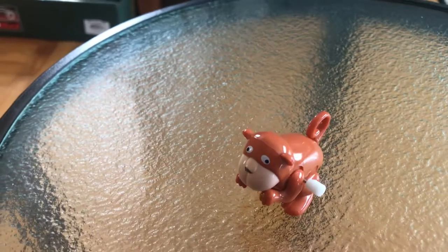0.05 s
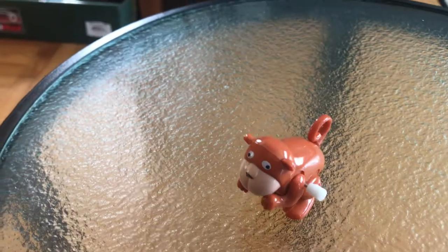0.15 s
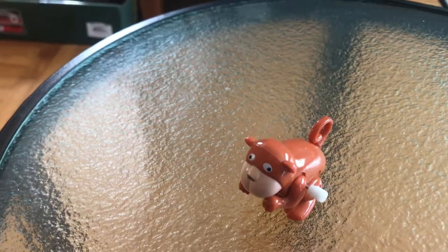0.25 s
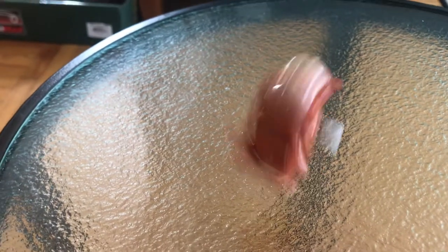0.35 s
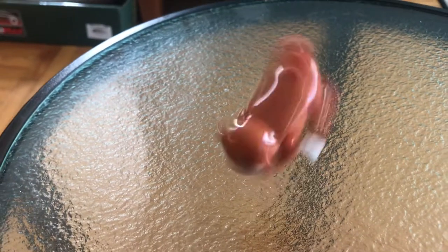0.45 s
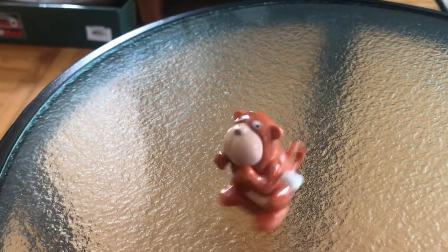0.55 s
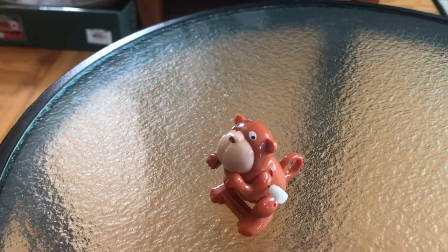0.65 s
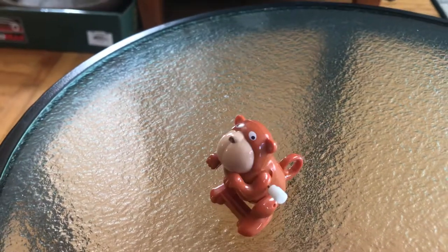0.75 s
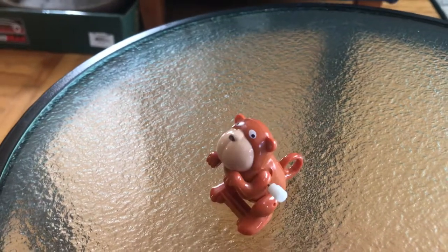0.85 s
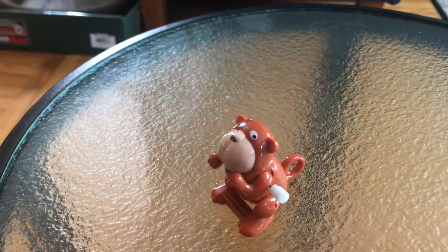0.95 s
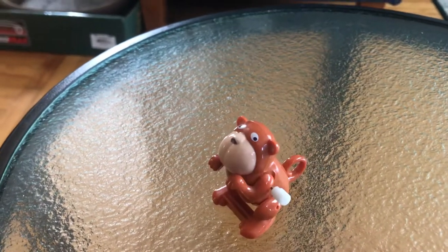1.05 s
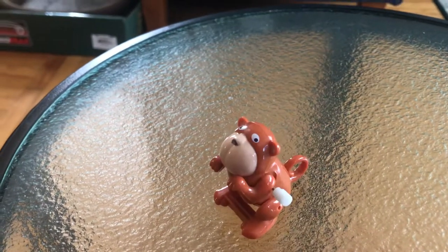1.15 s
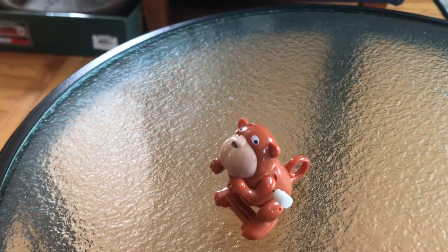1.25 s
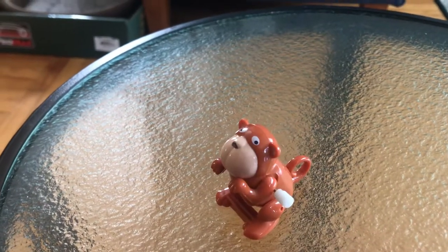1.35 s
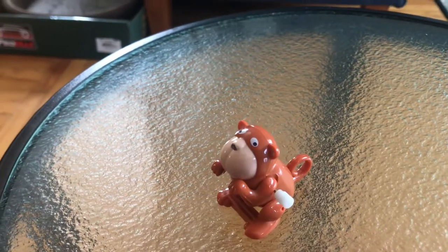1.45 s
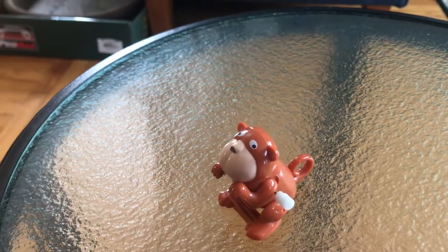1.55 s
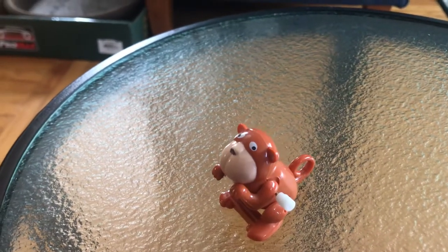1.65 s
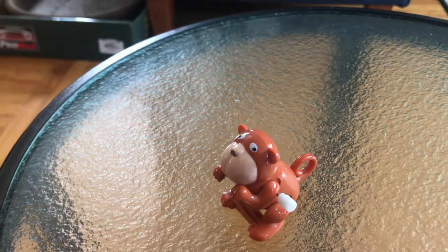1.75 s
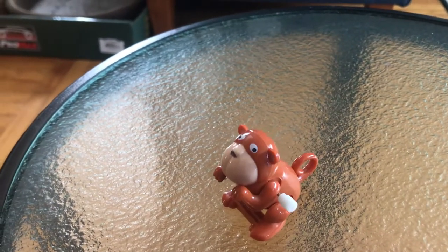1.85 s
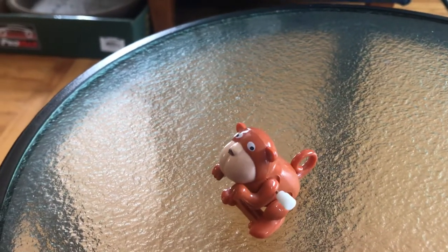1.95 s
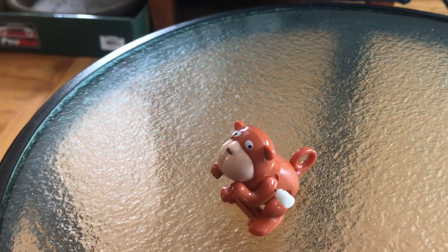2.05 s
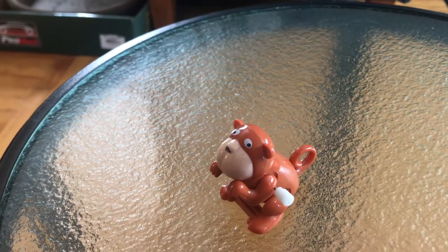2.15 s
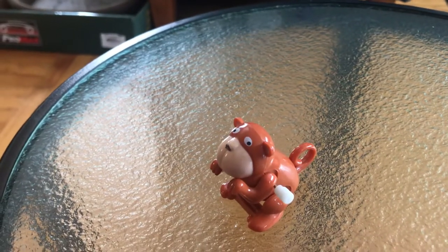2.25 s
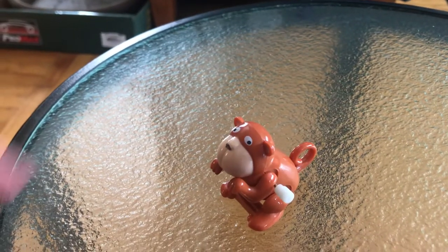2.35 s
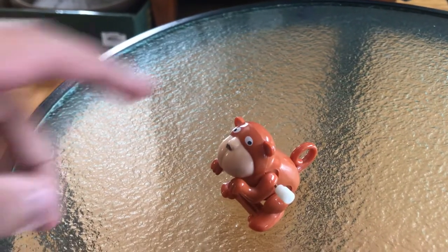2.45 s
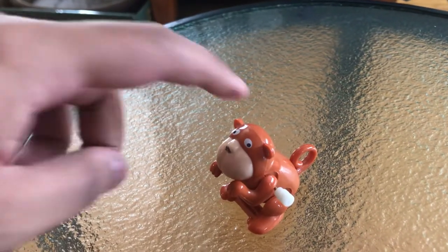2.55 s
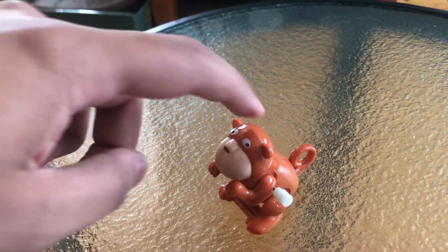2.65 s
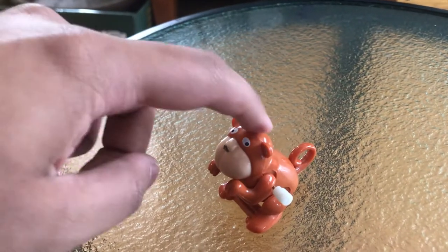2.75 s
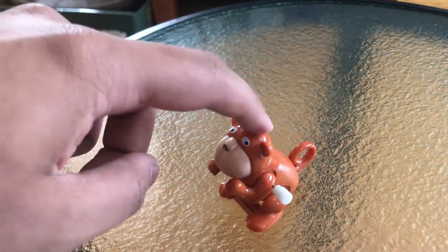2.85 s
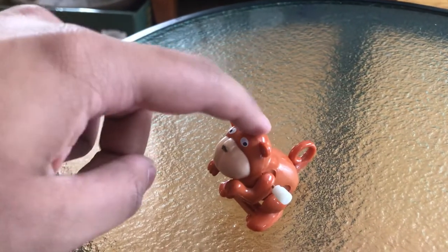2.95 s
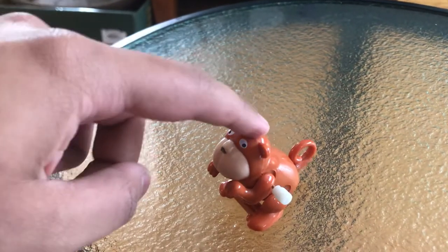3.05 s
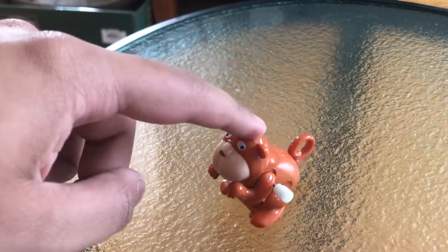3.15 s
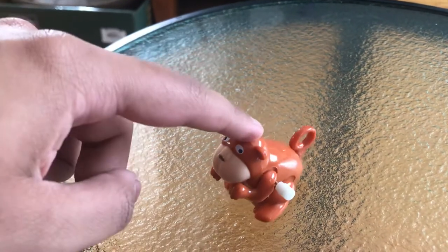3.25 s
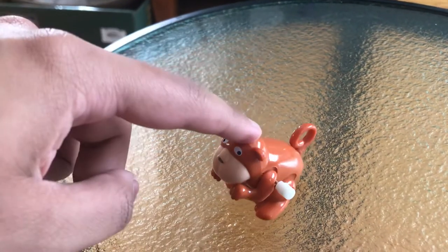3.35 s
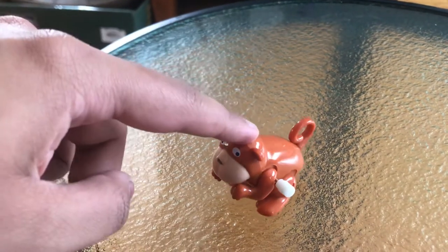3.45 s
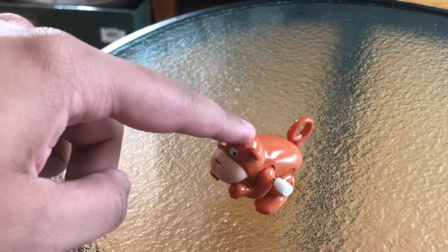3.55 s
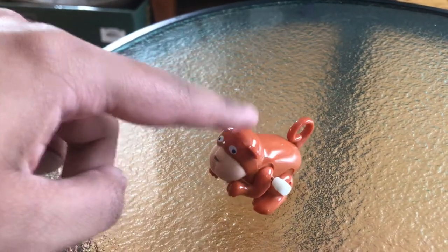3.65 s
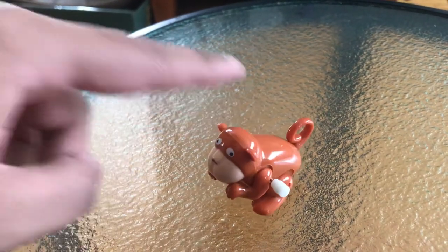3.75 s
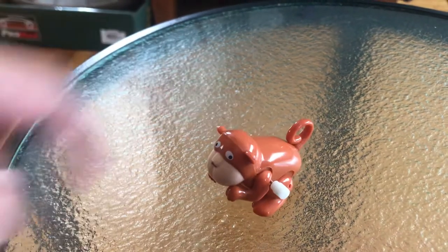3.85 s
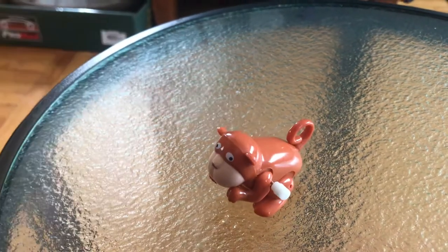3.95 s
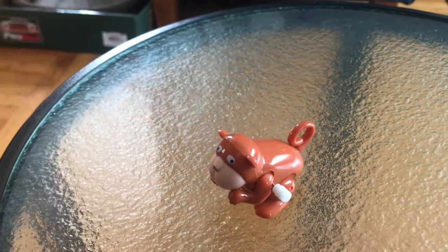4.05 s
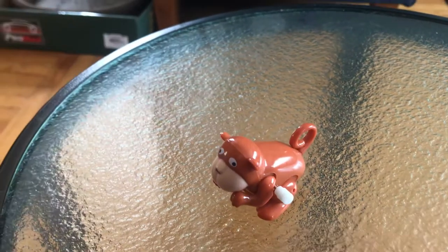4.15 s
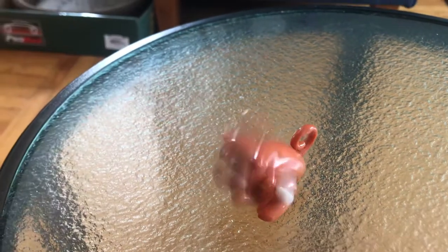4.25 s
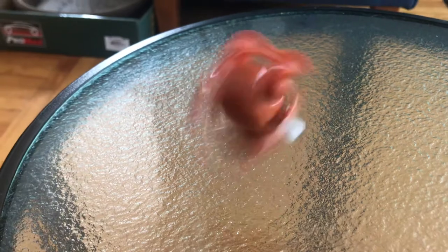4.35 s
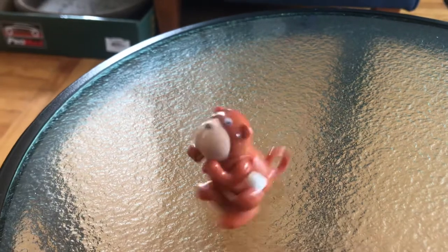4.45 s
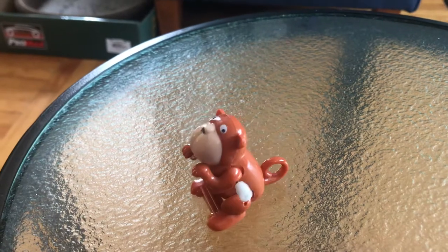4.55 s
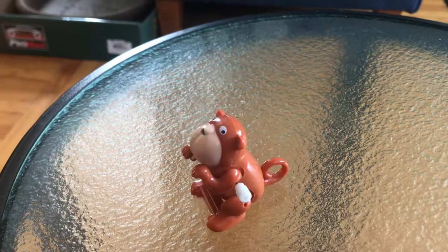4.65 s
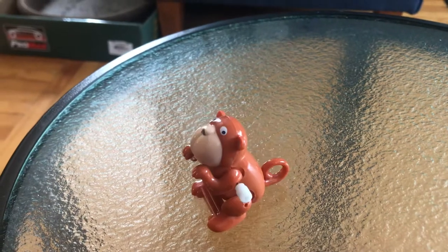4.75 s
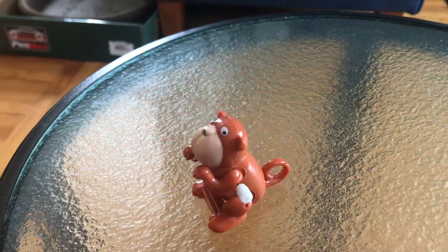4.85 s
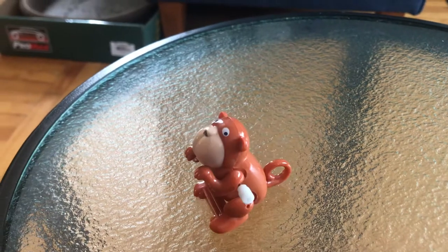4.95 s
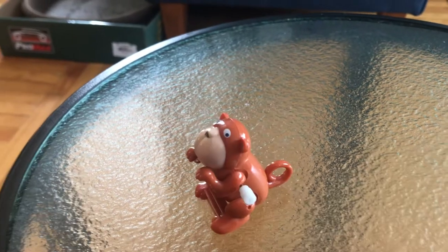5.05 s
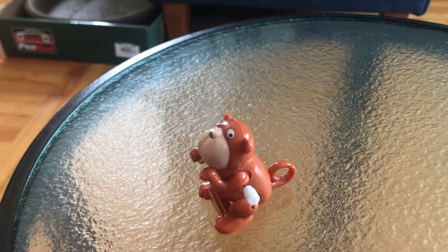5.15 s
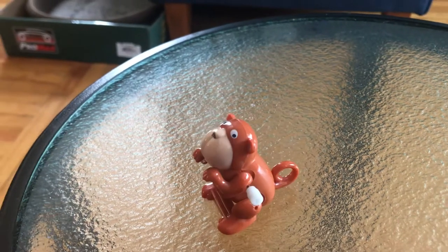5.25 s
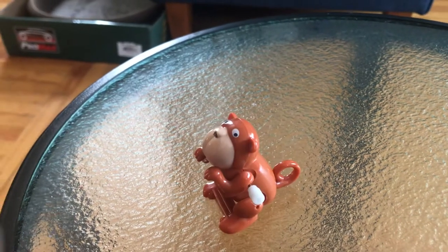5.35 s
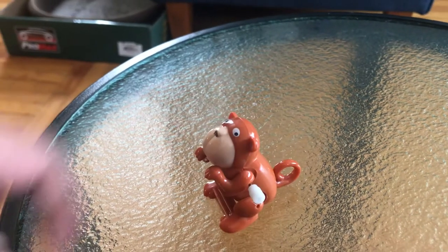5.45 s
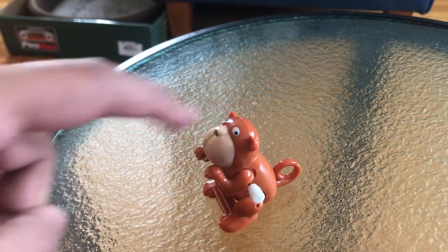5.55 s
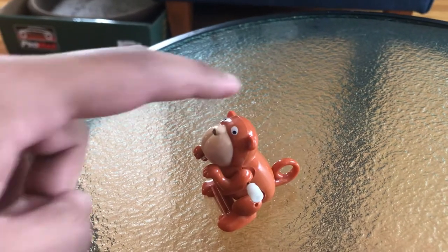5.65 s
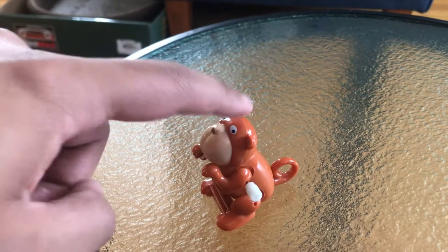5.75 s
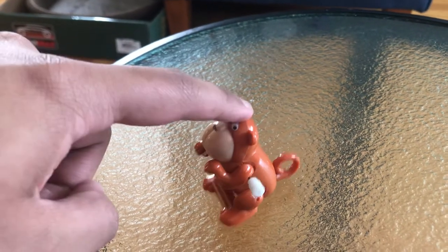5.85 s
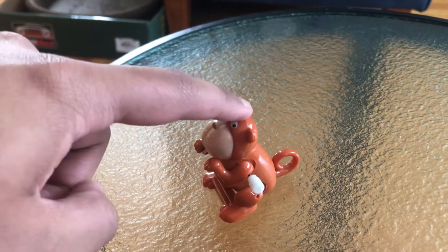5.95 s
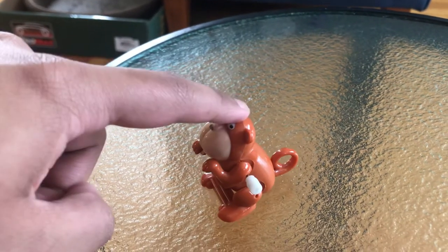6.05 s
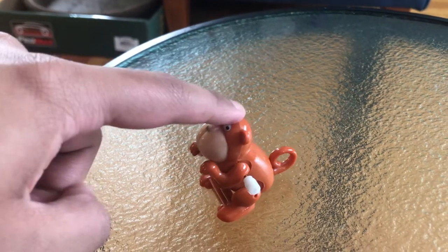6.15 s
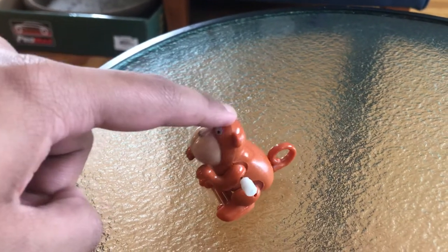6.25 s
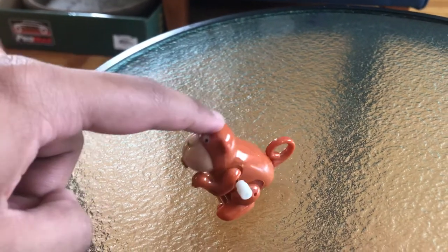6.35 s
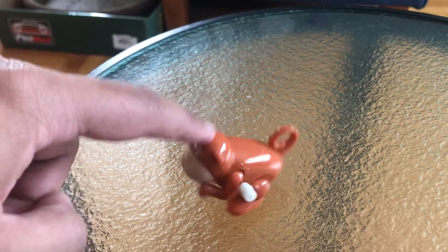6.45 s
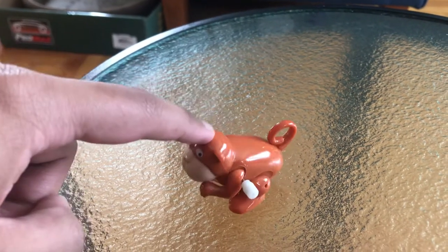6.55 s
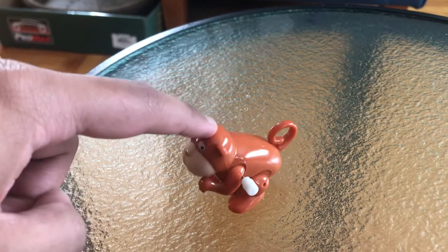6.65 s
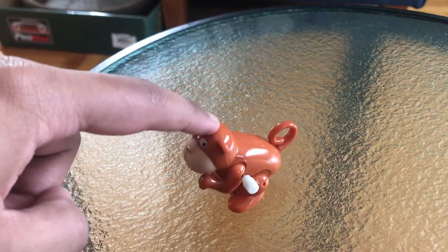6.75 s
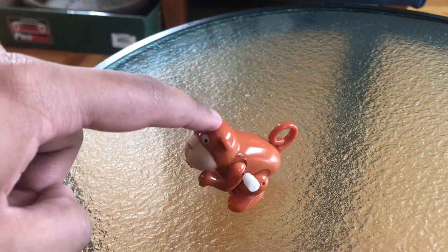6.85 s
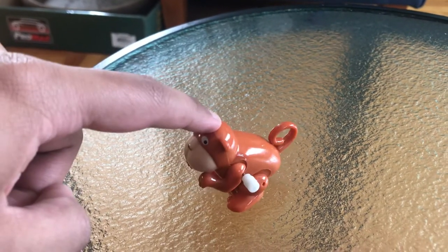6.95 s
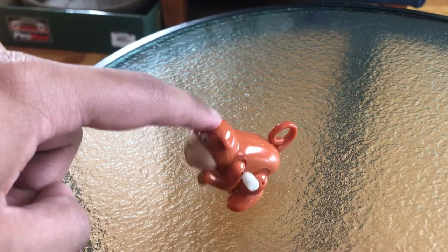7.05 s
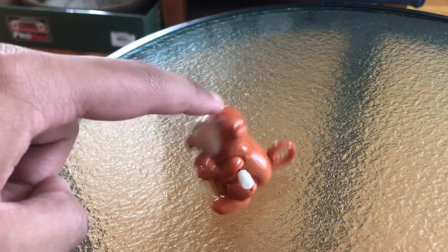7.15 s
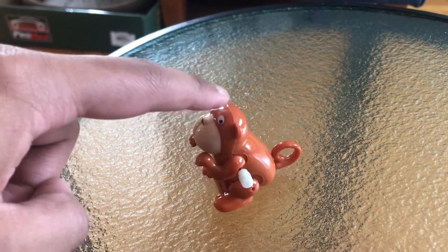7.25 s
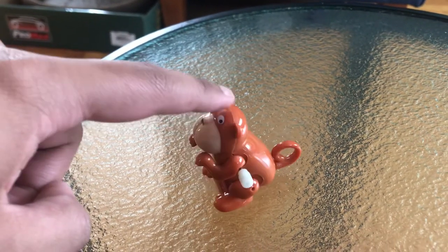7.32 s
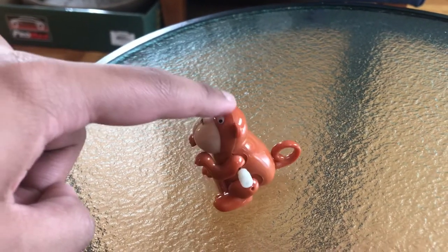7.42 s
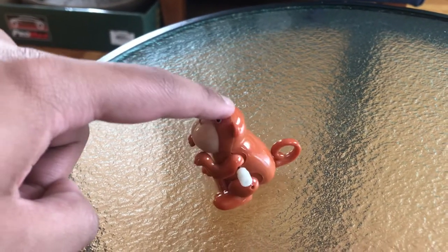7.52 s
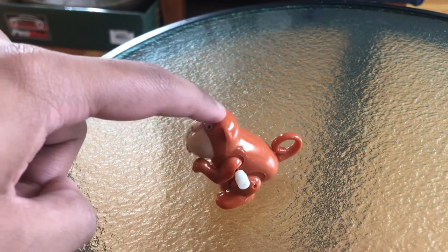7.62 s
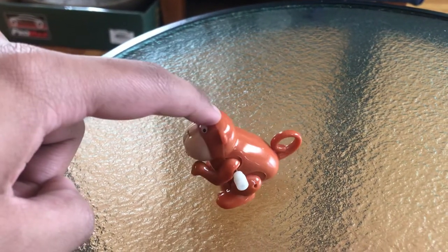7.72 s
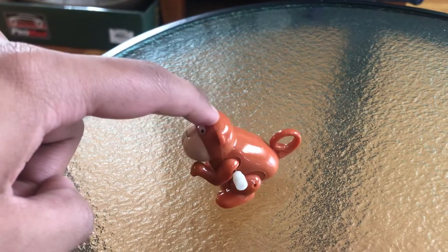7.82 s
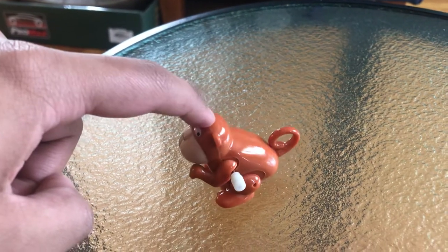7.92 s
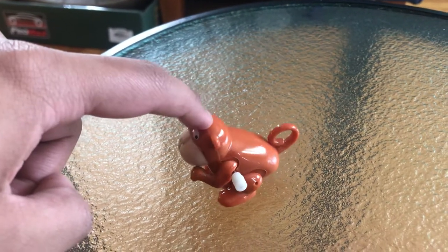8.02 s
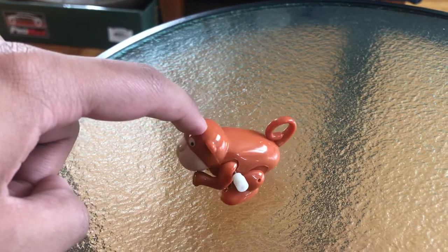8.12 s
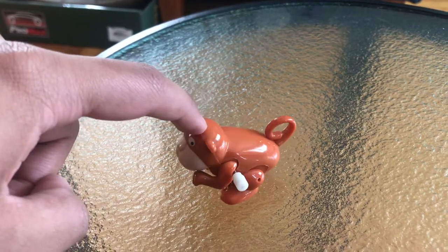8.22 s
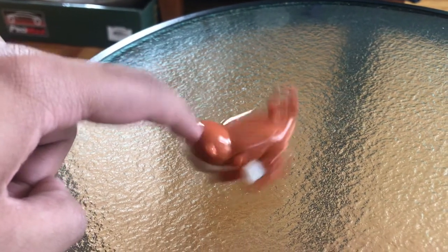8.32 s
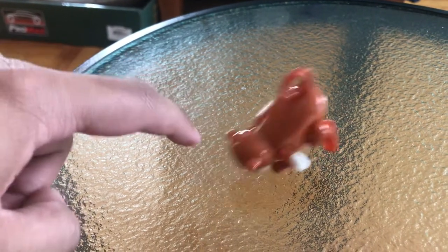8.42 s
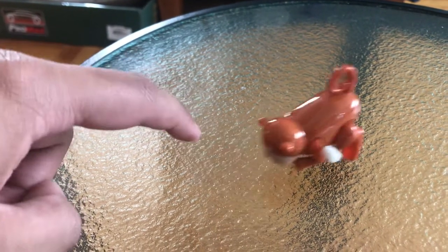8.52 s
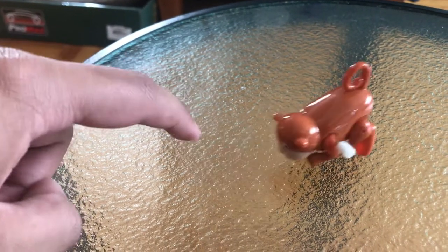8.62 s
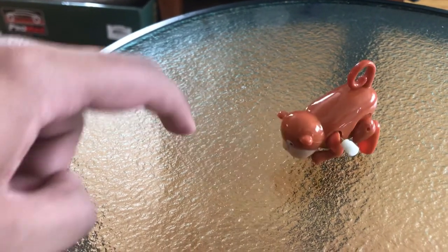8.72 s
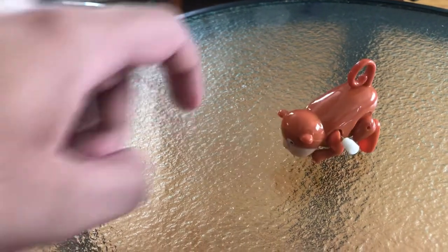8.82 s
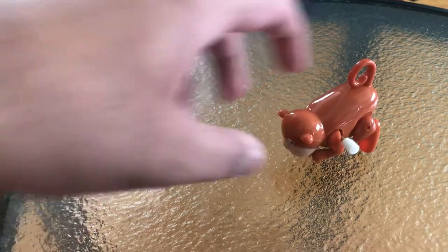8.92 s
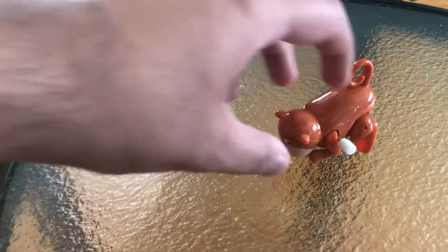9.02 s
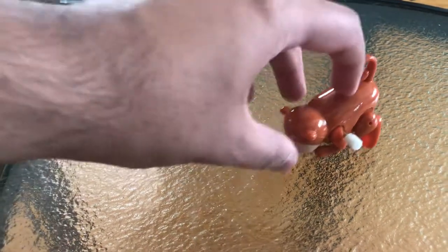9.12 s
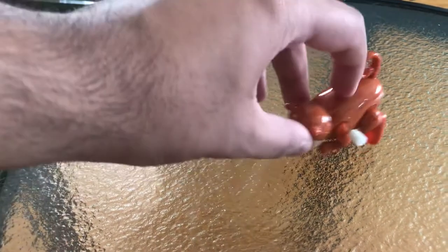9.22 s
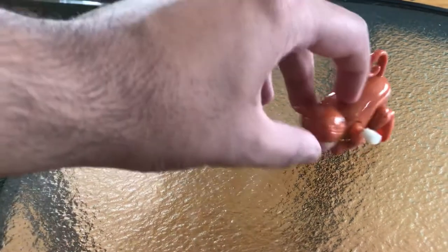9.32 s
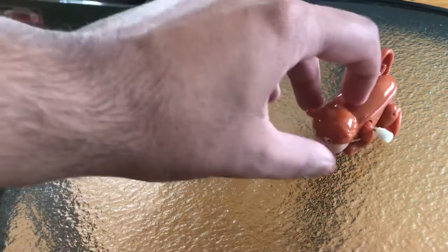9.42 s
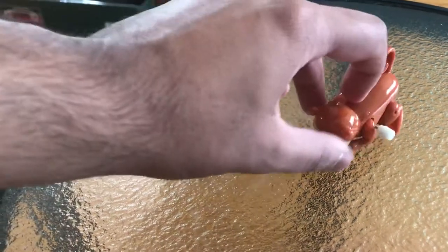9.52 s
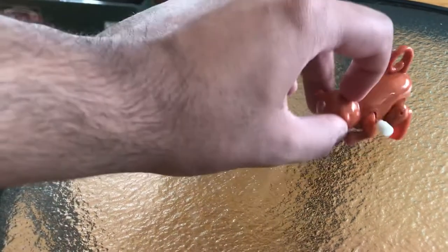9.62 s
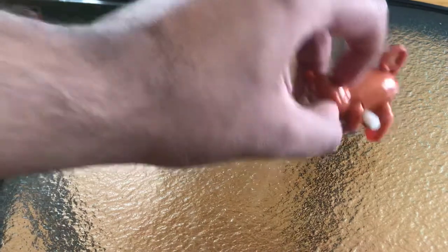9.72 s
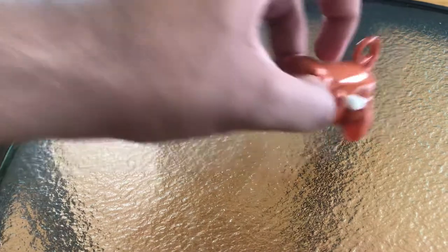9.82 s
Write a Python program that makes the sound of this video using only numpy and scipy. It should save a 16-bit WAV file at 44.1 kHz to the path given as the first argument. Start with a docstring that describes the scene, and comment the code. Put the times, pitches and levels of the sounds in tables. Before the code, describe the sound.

In a quiet room, close to the microphone, a plastic wind-up toy whirs brightly on a glass table. It snaps, flips and lands with a hard clattering crack, then the motor slows to ticks and stops. A finger sets it whirring again; another flip clacks down. More buzzing stalls and restarts, then a tumbling run of clacks and a few soft knocks end it.

```python
"""A wind-up plastic monkey whirs on a glass patio table, heard from close by in a quiet room.
The whirr is a stream of tiny tooth blows, made of shaped noise, heard through plastic shell and glass.
It runs down and is nudged on by a finger; the shell snaps in short noise bursts, and the toy flips.
Landings clatter on the glass: a crack, ringing modes and a wash. Last come soft knocks as a hand
picks the toy up. Behind it all lie filtered noise for the still room and a few faint hum tones."""
import sys
import numpy as np
from scipy import signal
from scipy.fft import rfft, irfft
from scipy.io import wavfile
from scipy.ndimage import uniform_filter1d

SR = 44100
rng = np.random.default_rng(int(sys.argv[2]) if len(sys.argv) > 2 else 0)


def materialize(psi):
    """Save the field psi as 16-bit PCM at rate SR to the path in sys.argv[1].

    A 1-D psi becomes a single channel; in a 2-D psi each row is a channel.
    """
    bounded = np.clip(np.atleast_2d(psi).T, -1, 1)
    quanta = np.round(bounded * 32767).astype(np.int16)
    wavfile.write(sys.argv[1], SR, quanta)


N = 435708
T = np.arange(N) / SR  # time in seconds

# The still room's rumble. Each row: frequency in Hz, relative level in dB per Hz.
ROOM_TONE = [(15, -49), (25, -20.5), (76, -4), (161, -10.5), (195, -4.5), (229, -16), (277, -4.5),
             (317, -16.5), (373, -17), (575, -23), (2690, -36.5), (2910, -31), (3160, -38), (4030, -36.5),
             (16000, -41.5)]
# A faint appliance hum. Each row: frequency in Hz, level in dB.
HUM_TONES = [(80.7, -63.5), (118.4, -71), (193.8, -68), (274.5, -70.5)]
# Dense wash of weaker glass modes and the room. Each row: frequency in Hz, relative level in dB.
WASH_COLOR = [(100, -14), (250, -3), (450, -5.5), (750, -6), (1200, -3.5), (2500, 0.5), (4000, -3.5),
              (8000, -8), (16000, -16)]
# How fast the wash dies. Each row: frequency in Hz, time to fall 60 dB in seconds.
WASH_FADE = [(200, .5), (1000, 0.32), (3500, 0.17), (8000, .27), (16000, .2)]
# The first crack of a contact. Each row: frequency in Hz, relative level in dB.
CRACK_COLOR = [(100, -22.5), (250, -0.5), (450, -6.5), (560, 1.5), (720, -6), (1100, 2), (1800, -2.5),
               (3300, -1), (4500, 1.5), (7000, -6.5), (10000, -6.5), (16000, -17)]
# Modes of the glass top with the toy on it.
# Each row: frequency in Hz, relative level in dB, time to fall 60 dB in seconds.
GLASS_MODES = [(58, -26, 0.89), (240.4, -5.5, 0.32), (249, -15, .14), (557, -14, 0.2), (584, -13.5, .12),
               (882, -29, 0.76), (1143, -5, 0.13), (1195, -16, 0.2), (1320, -21, .25), (1630, -5.5, 0.12),
               (1753, -9, 0.11), (1805, 1, 0.11), (1969, -8, .12), (2267, -9.5, 0.069), (2596, 0.5, 0.15),
               (2660, -13, .15), (2930, -6, .09), (3450, 0, 0.11), (3480, -2.5, 0.11), (3680, -14, .2),
               (4560, 0, .09), (4640, -1, 0.082), (5230, -16, .07), (5650, -7.5, 0.083), (6960, -11, 0.055),
               (7200, -9, 0.077)]
# Toy and fingers touch the glass. Each row: start in seconds, level in dB, hardness as a corner in Hz,
# chatter length in seconds, lift of the high ring in dB, lift of the low thump in dB (both relative).
TOUCHES = [(0.303, -17, 2600, 0.004, -3, -4.5), (.476, -2, 5900, 0.016, -1.5, 2),
           (0.4969, -11.5, 2510, 0.0074, 18.5, -17.5), (0.5401, -3.5, 3520, 0.0015, 8, -10.5),
           (4.225, -19, 2500, 0.0014, -1, 0), (4.242, -19, 2530, 0.0052, -5, -8),
           (4.4136, -2, 5930, 0.014, 0.5, 0.5), (4.434, -11, 3500, 0.0088, 12.5, -15),
           (4.4743, -5.5, 3500, 0.0029, 3, -2), (7.150, -17, 7000, 0.0042, -11.5, 9.5),
           (7.175, -17.5, 3000, 0.0048, -4.5, 1), (7.182, -9, 656, 0.0074, -4.5, -2),
           (7.206, -20, 3500, 0.003, -4, 0), (7.228, -26.5, 3520, .002, -3, -5),
           (8.328, -23.5, 1500, 0.017, -3, -1.5), (8.373, .5, 3370, 0.0042, 2.5, -2),
           (8.395, -19.5, 2500, .005, 0.5, -3), (8.421, 1.5, 1000, 0.0024, -0.5, 0),
           (8.451, -4.5, 1770, 0.0012, 2.5, -15), (8.462, -7.5, 1800, .001, -13, -2),
           (8.4734, -9, 2430, 0.0028, 6, 1), (8.4862, -14.5, 2800, 0.0019, -6, -5),
           (8.497, -5, 1940, 0.00086, 4.5, -2.5), (8.526, -18.5, 880, 0.014, -11, 5.5),
           (9.058, -30, 3500, 0.00089, -9.5, 2.5), (9.087, -13.5, 1025, .005, 3.5, -5.5),
           (9.0943, -9.5, 996, 0.0073, -3, -5), (9.237, -33, 550, 0.015, 4.5, -3),
           (9.313, -31, 451, 0.0031, -7.5, -6), (9.354, -35.5, 396, 0.015, -12, -7),
           (9.616, -22, 1000, .011, -5, 4.5)]
# The toy rocks to rest after a landing.
# Each row: start in seconds, length in seconds, level of the first tap in dB.
SETTLINGS = [(0.557, 0.045, -12.5), (4.492, 0.066, -14), (7.191, 0.039, -22), (8.507, .03, -11.5)]
# A snap in the plastic shell, from cam, limb or knock, then a second snap. Each row: start in seconds,
# level in dB, time to fall 60 dB in seconds, delay of the second snap in seconds.
SHELL_SNAPS = [(.302, -11.5, .009, 0.0062), (2.797, -35, 0.011, 0.0033), (4.241, -13, .014, 0.0033),
               (7.15, -19, .014, .005), (8.335, -21.5, .02, 0.0035), (8.344, -17.5, .02, 0.0071),
               (8.4875, -33.5, 0.053, 0.022), (9.597, -54.5, 0.032, 0.0099), (9.618, -39, 0.016, 0.0055)]
# What the plastic shell radiates. Each row: frequency in Hz, relative level in dB.
SHELL_COLOR = [(500, -24), (1500, -22), (2400, -9.5), (3100, -10.5), (3450, 0), (4000, 0), (5000, -4),
               (6500, 0), (7300, 2), (7900, -2.5), (9500, 0.5), (10300, -5), (12400, 2), (15600, -5)]
# What the glass radiates under the running toy. Each row: frequency in Hz, relative level in dB.
TABLE_COLOR = [(200, -25.5), (550, -14.5), (900, -2.5), (1200, 5), (1500, 0.5), (1800, 2.5), (2500, -2.5),
               (4000, -8)]
# Shell resonances that sing out as the pose and the finger load it. Each row: start in seconds,
# end in seconds, frequency in Hz, width of one filter pass in Hz, level in dB before fading in and out.
SHELL_BUZZES = [(0.0, 0.33, 2910, 410, -44.5), (0.0, .3, 14000, 1800, -37), (0.297, 0.43, 4930, 790, -38),
                (0.298, 1.498, 11000, 900, -47), (4.547, 5.004, 8630, 1000, -40.5),
                (5.842, 6.086, 1770, 380, -45), (6.06, 6.327, 5760, 700, -43),
                (6.45, 6.57, 5640, 1400, -33.5), (6.4, 6.8, 7400, 1200, -39),
                (7.587, 8.316, 8220, 2600, -40), (8.004, 8.337, 5820, 1300, -39),
                (8.334, 8.356, 14500, 3500, -14)]
# Spring motor speed before any snag, one curve for each run.
# Each row of a curve: time in seconds, escapement beats per second.
SPEED_RUNS = [
    [(0, 600), (.3, 750), (.8, 730), (1.11, 630), (1.4, 440), (1.7, 275), (2.05, 145), (2.17, 80),
     (2.255, 45)],
    [(2.795, 140), (3.03, 225), (3.1, 450), (3.2, 590), (3.55, 540), (3.62, 230), (3.95, 500), (4.3, 690),
     (4.95, 590), (5, 330), (5.1, 140), (5.18, 40)],
    [(5.845, 330), (5.88, 560), (6.1, 600), (6.75, 520), (6.96, 400), (7.065, 50), (7.09, 130), (7.14, 165)],
    [(7.532, 80), (7.558, 150), (7.58, 460), (7.65, 560), (8.3, 500), (8.348, 580), (8.362, 65)],
]
# The gears bind for a moment. Each row: middle in seconds, share of speed lost at the worst point.
GEAR_SNAGS = [(1.0, .28), (6.842, 0.33)]
# Somersaults. Each row: take-off in seconds, touch-down in seconds, end of sitting upright in seconds.
SOMERSAULTS = [(0.31, 0.484, 1.34), (4.245, 4.416, 7.1)]
# A finger presses on the head. Each row: start in seconds, end in seconds, change of level in dB,
# change of brightness in dB, change of the share passed to the glass in dB.
FINGER_PRESSES = [(2.79, 3.588, 0.55, -2.5, -1), (6.065, 7.15, .5, 2, -5), (7.626, 8.37, -1, 0, 0.5)]

ROOM_DB = -58
AFTER_FACTOR = 3.4  # the faint aftersound of each glass mode lasts this many times longer...
MOST_CYCLES = 1700  # ...but losses in the glass make it fall 60 dB within this many cycles
TAP_GAP_S, TAP_FADE_DB = .015, -6  # mean time between rocking taps; how far they fade by the end
TAP_HZ, TAP_CHATTER_S = 2000, 0.0024  # hardness and chatter of a tap
TAP_RING_DB, TAP_THUMP_DB = -2, -5
SECOND_SNAP_DB = -3.5  # the second snap, against the first
SHAKE_DB, SHAKE_S = -26.5, .026  # a hard knock also rings the plastic: level against it, 60 dB fall time
SHAKE_HZ = 900  # touches softer than this hardness barely ring it
SNAG_S = .03  # half the length of a snag

# Faster teeth hit harder and brighter, until the level flattens out above the knee.
LOUDEST_DB, KNEE_BEATS_PER_S, DB_PER_OCTAVE = -22.5, 733, 11.5
CRAWL_BEATS_PER_S = 24  # below this speed each tooth still drops with the same force
BRIGHT_DB, BRIGHT_DB_PER_OCTAVE = 2, 1.45  # brightness at the knee, and its slope with speed
GLASS_DB = -22  # share of the whirr that the feet pass to the glass when the toy crouches
AIR_BRIGHT_DB, AIR_GLASS_DB = 3.5, -9.5  # in the air: thinner whirr, far less of it in the glass
DIP_S, DIP_DB = 0.21, -6  # the whirr's level dips briefly after the touch-down of a somersault
UPRIGHT_GLASS_DB = 4.5  # sitting upright passes more to the glass
POSE_S = 0.027  # length of the ramps from one state of the whirr to the next
HELD_FROM_S = 5.1  # the finger stays on the toy from here on
EDGE_HZ = 15900  # upper band limit


def amp(db):
    """Turns decibels into gain."""
    return 10 ** (np.asarray(db) / 20)


def unit(x):
    """Scales to an rms of 1."""
    return x / np.sqrt(np.mean(x ** 2) + 1e-20)


def read(points, hz):
    """Joins (Hz, value) points with straight lines on a log-frequency axis."""
    f, value = np.transpose(points)
    return np.interp(np.log(hz + 1), np.log(f), value)


def add(mix, s, sound):
    """Lays a sound into the mix at time s."""
    part = mix[max(round(s * SR), 0):][:len(sound)]
    part += sound[:len(part)]


def impulse(points, size=2048):
    """Makes a click of energy 1 with the given spectrum, with nothing sounding before its start."""
    hz = abs(np.fft.fftfreq(size, 1 / SR))
    log_gain = np.log(amp(read(points, hz)))
    # the Hilbert transform gives the phase that packs the energy to the front
    h = np.fft.ifft(np.exp(np.conj(signal.hilbert(log_gain)))).real
    return h / np.linalg.norm(h)


def through(x, h):
    """Passes x through the response h."""
    return signal.oaconvolve(x, h)[:len(x)]


def drift(per_s):
    """Makes a smooth random curve of rms 1 by keeping only slow wobbles of noise."""
    hz = np.fft.rfftfreq(N, 1 / SR)
    spectrum = rfft(rng.standard_normal(N))
    return unit(irfft(spectrum * np.exp(-(hz / per_s) ** 2), N))


def resonate(x, hz, width):
    """Applies a two-pole resonance twice, for steep sides."""
    b, a = signal.iirpeak(hz, hz / width, fs=SR)
    once = signal.lfilter(b, a, x)
    return signal.lfilter(b, a, once)


def during(start, end):
    """Gives 1 between two times and 0 outside, with short ramps."""
    return np.clip(.5 + np.minimum(T - start, end - T) / POSE_S, 0, 1)


def room(waver=.4):
    """The still room: a low steady rumble of noise, and hum tones with a wavering phase."""
    rumble = unit(through(rng.standard_normal(N), impulse(ROOM_TONE, size=16384)))
    out = amp(ROOM_DB) * rumble
    for hz, db in HUM_TONES:
        phase = 2 * np.pi * hz * T + waver * drift(7.1)
        out += amp(db) * np.sqrt(2) * np.sin(phase)
    return out


def wash(build_s=.004):
    """A diffuse tail of energy 1: noise that builds up fast, then each pitch dies at its own rate."""
    hz, t, z = signal.stft(rng.standard_normal(SR), SR, nperseg=256)
    level_db = read(WASH_COLOR, hz)[:, None]
    fade_db = -60 * t / read(WASH_FADE, hz)[:, None]
    tail = signal.istft(z * amp(level_db + fade_db), SR, nperseg=256)[1][:SR]
    tail = tail * (1 - np.exp(-T[:SR] / build_s))
    return tail / np.linalg.norm(tail)


def chatter(length_s, light_hz, size=0.9, linger=0.14):
    """A first contact, then loose limbs hit again about once a millisecond; being light, they lack bass."""
    contacts = np.zeros(SR // 10)
    at = np.arange(30, 3000, 40) + rng.integers(0, 36, 75)  # in samples, unevenly spaced
    age = T[at] / length_s
    strength = size * np.exp(-age ** 3) + linger * np.exp(-age / 2)
    contacts[at] = rng.choice([-1, 1], len(at)) * strength
    bass_cut = signal.butter(2, light_hz, "high", fs=SR, output="sos")
    contacts = signal.sosfilt(bass_cut, contacts)
    contacts[0] = 1  # the first contact keeps its bass
    return contacts


def rocking():
    """Light, fading, unevenly spaced taps as the toy settles, in the same columns as the touches."""
    taps = []
    chances = rng.random((len(SETTLINGS), 12))
    for (start, length, db), chance in zip(SETTLINGS, chances):
        gaps = TAP_GAP_S * (.5 + chance)
        ages = np.cumsum(gaps) - gaps[0]
        for age in ages[ages < length]:
            tap_db = db + TAP_FADE_DB * age / length
            taps.append((start + age, tap_db, TAP_HZ, TAP_CHATTER_S, TAP_RING_DB, TAP_THUMP_DB))
    return taps


def knocks(crack_db=11, modes_db=-27, wash_db=-1, after_db=-23, spot_db=4.0, spread_s=0.00054,
           whole_hz=700, lightness=0.33, wash_follows=.45):
    """Each blow cracks, rings the pane's modes and leaves a faint wash; the softer the push, the duller."""
    out, t, hz = np.zeros(N), T[:SR], np.fft.rfftfreq(SR, 1 / SR)
    # bending waves travel with the square root of frequency, so the bass arrives late (spread_s at 1 kHz)
    delay = np.exp(-4j * np.pi * spread_s * np.sqrt(1000 * hz))
    crack = amp(crack_db) * irfft(rfft(impulse(CRACK_COLOR), SR) * delay, SR)

    # every mode has a prompt ring and a faint, longer aftersound
    f, db, t60 = np.transpose(GLASS_MODES)[:, :, None]
    after_t60 = np.minimum(AFTER_FACTOR * t60, MOST_CYCLES / f)
    decay = amp(-60 * t / t60) + amp(after_db - 60 * t / after_t60)
    modes = amp(db + modes_db) * decay * np.exp(2j * np.pi * f * t)
    # low modes move the whole pane alike; high ones depend on the spot that is hit
    local = np.minimum((f[:, 0] / whole_hz) ** 2, 1)

    for s, level_db, hard_hz, chatter_s, ring_db, thump_db in TOUCHES + rocking():
        contacts = chatter(chatter_s, lightness * hard_hz)
        # the ringing grows with the energy of the contacts so far
        stored = np.sqrt(np.cumsum(np.pad(contacts, (0, SR - len(contacts))) ** 2))
        high_db = ring_db + spot_db * rng.standard_normal(len(f))
        spot = amp(local * high_db + (1.5 - local) * thump_db)
        spot = spot * np.exp(2j * np.pi * local * rng.random(len(f)))
        ring = stored * (spot @ modes).imag
        burst = crack + amp(wash_db + wash_follows * ring_db) * wash()
        blow = through(burst, contacts) + ring
        # a soft contact pushes for longer, which dulls the blow
        u = 2 * np.pi * hard_hz * T[1:257]
        push = np.sqrt(u) * np.exp(-u)
        add(out, s, amp(level_db) * through(blow, push / push.sum()))
    return out


def snaps():
    """Double snaps and the knocks ring the plastic shell briefly, as dying bursts of noise."""
    out, t = np.zeros(N), T[:3000]
    rings = []
    for s, db, t60, delay in SHELL_SNAPS:
        rings.append((s, db, t60))
        rings.append((s + delay, db + SECOND_SNAP_DB, t60))
    for s, db, hard_hz, *_ in TOUCHES:
        softness_db = -10 * np.log10(1 + (SHAKE_HZ / hard_hz) ** 4)
        rings.append((s, db + SHAKE_DB + softness_db, SHAKE_S))
    for s, db, t60 in rings:
        add(out, s, amp(db - 60 * t / t60) * rng.standard_normal(len(t)))
    return through(out, impulse(SHELL_COLOR))


def drive():
    """Speed sets the whirr's level and brightness; flips and the finger change how it reaches air and glass."""
    beats = sum(np.interp(T, *np.transpose(run), left=0, right=0) for run in SPEED_RUNS)
    for s, lost in GEAR_SNAGS:
        beats = beats * (1 - lost * np.exp(-((T - s) / SNAG_S) ** 2))
    speed = np.hypot(beats, CRAWL_BEATS_PER_S) / KNEE_BEATS_PER_S
    level_db = LOUDEST_DB + DB_PER_OCTAVE * np.log2(speed / np.hypot(1, speed))
    bright_db = BRIGHT_DB + BRIGHT_DB_PER_OCTAVE * np.log2(speed)
    contact_db = np.full(N, GLASS_DB, float)
    for off, down, until in SOMERSAULTS:
        level_db += DIP_DB * during(down, down + DIP_S)
        bright_db += AIR_BRIGHT_DB * during(off, down)
        contact_db += AIR_GLASS_DB * during(off, down)
        contact_db += UPRIGHT_GLASS_DB * during(down, until)
    for start, end, louder_db, brighter_db, firmer_db in FINGER_PRESSES:
        pressed = during(start, end)
        level_db += louder_db * pressed
        bright_db += brighter_db * pressed
        contact_db += firmer_db * pressed
    return beats, level_db, bright_db, contact_db


def escapement(beats, jitter=0.065, uneven_db=1.0, limp=0.1, rise_s=0.00055, scrape_s=0.0005,
               rattle_s=0.009, rattle_db=-20):
    """Teeth hit two pallets in turn; each beat is a short scrape and a fainter rattle of noise. Rms near 1."""
    turns = np.cumsum(beats * (1 + jitter * drift(150))) / SR
    # the two pallets are unlike: beats come long-short and strong-weak
    count = np.floor(turns + limp * np.cos(np.pi * turns))
    at = np.flatnonzero(np.diff(count) > 0)
    uneven = amp(uneven_db * rng.standard_normal(N))[at]
    force = uneven * (1 + limp * (-1) ** count[at])
    blows = np.zeros(N)
    blows[at] = unit(force) ** 2 * SR / np.maximum(beats[at], 40)  # power of each blow
    t = T[:1500]
    fall = np.exp(-t / scrape_s) + amp(rattle_db) * np.exp(-t / rattle_s)
    power = ((1 - np.exp(-t / rise_s)) ** 2 * fall) ** 2
    loudness = np.sqrt(abs(through(blows, power / power.sum())))
    return loudness * rng.standard_normal(N)


def turning(x, bright_db, wander_db=2.0, fine_db=2.43):
    """The shell's many small resonances shift as the limbs move; the brightness tilts with the load."""
    hz, t, z = signal.stft(x, SR, nperseg=512, noverlap=384)
    a, b = rng.standard_normal((2,) + z.shape)
    # random patches over pitch (axis 0) and time (axis 1)
    broad = unit(uniform_filter1d(uniform_filter1d(a, size=6, axis=0), size=45, axis=1))
    fine = unit(uniform_filter1d(uniform_filter1d(b, size=2, axis=0), size=200, axis=1))
    slope = read([(4500, -0.64), (13000, 0.52)], hz)[:, None]
    tilt_db = slope * np.interp(t, T, bright_db)
    z = z * amp(wander_db * broad + fine_db * fine + tilt_db)
    return signal.istft(z, SR, nperseg=512, noverlap=384)[1][:N]


def motor(shell_db=1.0, ring_hz=3520, ring_width=600, ring_db=-18, damped_db=-10):
    """The escapement sounds through the shell, its passing resonances and the glass underfoot."""
    beats, level_db, bright_db, contact_db = drive()
    ticks = escapement(beats)
    shell = turning(through(ticks, impulse(SHELL_COLOR)), bright_db) * amp(level_db + shell_db)
    # a finger resting on the head damps the shell's main ring
    finger = np.clip((T - HELD_FROM_S) / 0.12, 0, 1)
    main_ring = unit(resonate(ticks, ring_hz, ring_width))
    shell += amp(level_db + ring_db + damped_db * finger) * main_ring
    table = through(ticks, impulse(TABLE_COLOR)) * amp(level_db + contact_db)
    for start, end, hz, width, db in SHELL_BUZZES:
        gate = np.clip(np.minimum(T - start, end - T) / .05, 0, 1)
        shell += amp(db) * gate * unit(resonate(ticks, hz, width))
    return shell + table


def scene(echo_db=-18):
    """The toy with a little room echo, its knocks on the glass and the room, alike in both channels."""
    toy = motor() + snaps()
    echo = amp(echo_db) * through(toy, wash())
    mono = toy + echo + room() + knocks()
    return np.array([mono, mono])


def record(dry, ceiling=1.3, low_cut_hz=42):
    """The microphone sheds deep bass and softly clips the loudest clacks; then the top is cut off."""
    bass_cut = signal.butter(4, low_cut_hz, "high", fs=SR, output="sos")
    lean = signal.sosfilt(bass_cut, dry)
    clipped = ceiling * np.tanh(lean / ceiling)
    top_cut = signal.firwin(401, EDGE_HZ, window=("kaiser", 9), fs=SR)
    return signal.oaconvolve(clipped, top_cut[None], "same")


dry = scene()
out = record(dry)
materialize(out)
```